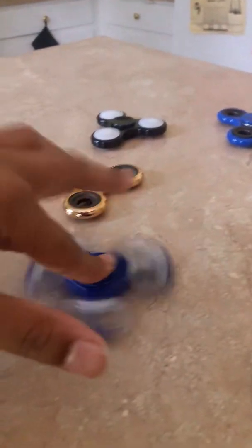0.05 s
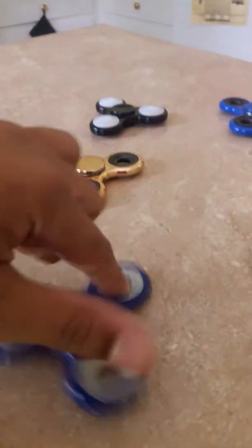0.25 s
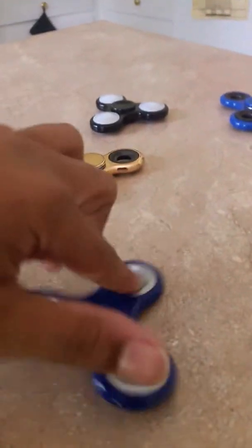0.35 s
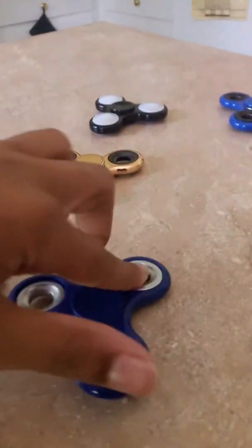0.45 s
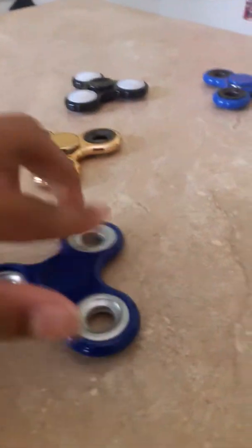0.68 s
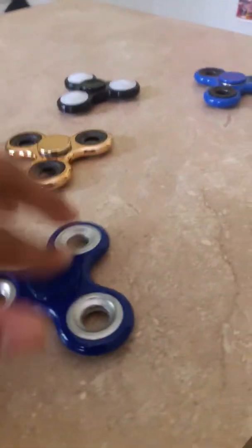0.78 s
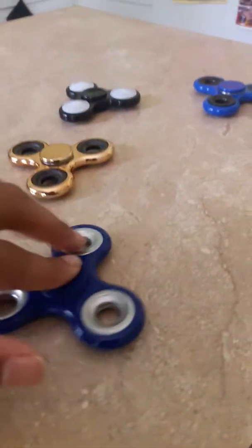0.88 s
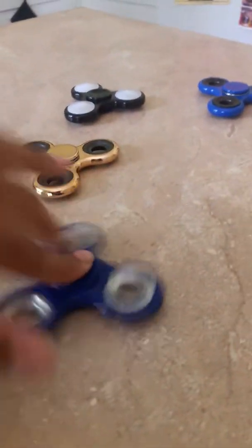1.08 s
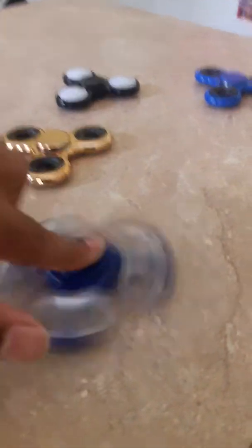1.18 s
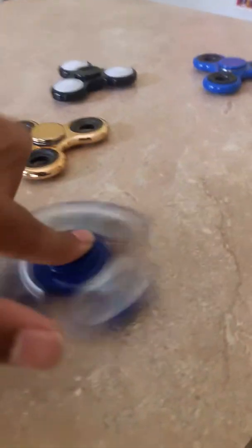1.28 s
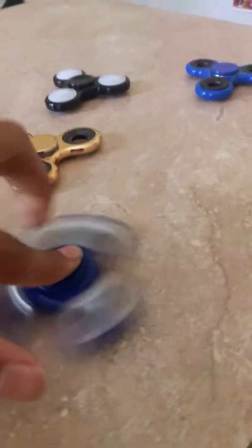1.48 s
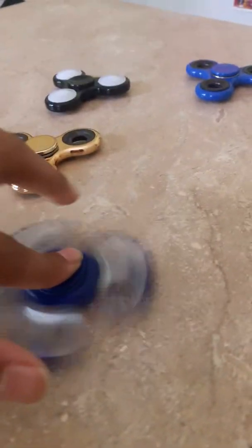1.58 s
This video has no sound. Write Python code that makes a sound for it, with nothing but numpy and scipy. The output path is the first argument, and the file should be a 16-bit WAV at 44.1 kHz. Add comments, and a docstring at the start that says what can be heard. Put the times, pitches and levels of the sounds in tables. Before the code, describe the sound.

A plastic fidget spinner whirs on a counter, is stopped with a clattering rattle, then flicked spinning again

```python
"""A plastic fidget spinner whirs on a kitchen counter: ball rumble, a low hum and grainy bearing hiss.
A finger stops it and it clacks and rattles on the top, as struck modes of counter, body and steel bearing.
Fingertips squeak (gliding tones) and rub in a new grip, among soft bumps, low thumps, bearing ticks and
rustles (noise bands). A finger flicks the spinner with hard clacks and the whir resumes.
The hard room rings after each clack."""
import sys
import numpy as np
from scipy import signal
from scipy.fft import rfft, irfft
from scipy.io import wavfile
from scipy.ndimage import uniform_filter1d

SR = 44100
rng = np.random.default_rng(int(sys.argv[2]) if len(sys.argv) > 2 else 0)


def bounce(signal):
    """Save signal as a 16-bit WAV file at the path given by the first command-line argument."""
    frames = np.transpose(np.atleast_2d(signal))
    limited = np.clip(frames, -1, 1)
    pcm = np.round(limited * 32767).astype(np.int16)
    wavfile.write(sys.argv[1], SR, pcm)


N = 72765

# Quiet kitchen spectrum. Each row: frequency in Hz, relative level in dB.
FLOOR_SPECTRUM = [(20, 0.5), (65, 0), (140, 2.5), (300, -3), (600, -8.5), (1100, -14.5), (2500, -27),
                  (4500, -39), (9000, -43), (16000, -38)]
FLOOR_DB = -58.5
# Left-right correlation of noises. Each row: frequency in Hz, likeness from 0 to 1.
STEREO_LIKENESS = [(50, 0.91), (300, 0.94), (700, 0.32), (1500, 0.21), (3000, 0.05), (16000, .1)]

# Decay of the room's tail. Each row: frequency in Hz, time to fall 60 dB in seconds.
ROOM_T60_S = [(100, 0.5), (350, 0.5), (1000, 0.46), (5000, 0.47), (8000, 0.39), (15000, 0.25)]
# Spectrum of the room's tail. Each row: frequency in Hz, relative level in dB.
ROOM_COLOUR = [(60, 6), (120, 8), (200, -2.5), (350, -3), (700, 0.5), (1400, -2.5), (2500, 3), (5000, 5),
               (8000, -2), (15000, 7)]
# Standing waves. Each row: frequency in Hz, relative level in dB, time to fall 60 dB in seconds.
ROOM_MODES = [(272, -36.5, 0.52), (410, -33.5, 0.2), (885, -49.5, .44)]
# Spectrum of the quick echoes. Each row: frequency in Hz, relative level in dB.
NEAR_COLOUR = [(100, 2.0), (1000, -1.5), (7000, -2.5), (15000, -6.5)]
ROOM_DB, ROOM_DELAY_S, BLOOM_S_AT_100_HZ = -3.5, 0.0063, 0.05
NEAR_DB, NEAR_DECAY_S, NEAR_RISE_S, NEAR_TAPS_PER_S = -6.5, 0.011, 0.00045, 1100
ROOM_MODES_DB, SPIN_ROOM_DB = -28.5, -4  # second: extra gain of the spin into the room

# Counter booming under the clacks. Each row: start in seconds, frequency in Hz, level in dB.
BOOMS = [(.207, 73.6, -41.5), (0.274, 124.8, -34.5), (1.25, 117.7, -40.5)]
BOOM_RISE_S = 0.02

# Fingertips slipping on plastic. Each row: start in seconds, length in seconds, start pitch in Hz,
# end pitch in Hz, level in dB.
SQUEAKS = [(.42, .035, 1080, 1120, -45), (.445, .045, 950, 915, -44), (.603, .016, 620, 520, -47),
           (.605, .02, 1080, 1120, -49)]
SQUEAK_JITTER, SQUEAK_OCTAVE_DB = 0.07, -13.5  # rms fraction of pitch; second harmonic
# Skin rubbing on the spinner (low rows); faint bearing rustles and a brief high tick (6-7 kHz rows).
# Each row: start in seconds, length in seconds, centre in Hz, level in dB.
RUBS_AND_RUSTLES = [(0.166, 0.014, 423, -41.5), (0.196, 0.01, 456, -34), (0.475, 0.0043, 6050, -52.5),
                    (0.913, 0.12, 6890, -80), (1.109, 0.055, 7190, -78), (1.146, 0.058, 295, -41)]
BAND_WIDTH_HZ_AT_1_KHZ = 281  # grows with the root of the centre

# Hard clacks: spinner on the counter, then a finger flicking the spinner. Each row: start in seconds,
# then relative levels of counter, body, clack and tick in dB, pitch factor of body and clack.
HARD_CLACKS = [(.2059, -17, -3, -9, -11, 1.034), (0.2076, -30.5, -12, -17, -16.5, 0.81),
               (0.2164, -28.5, -15.5, -24, -27.5, 1.14), (.2245, -33, -18.5, -20, -36.5, 1.14),
               (0.2295, -31, -16, -14, -34, 0.82), (.2470, -14, -10, -9.5, -29, .96),
               (0.2493, -34.5, -24.5, -34.5, -13.5, 0.75), (.2540, -20.5, -20, -8.5, -12, 1.05),
               (0.2624, -17.5, -11, -11.5, -10.5, .91), (.2685, -18.5, -8, -2.5, -25, 1.04),
               (0.2707, -17.5, -11.5, -7.5, -6.5, .95), (0.2757, -30.5, -16, -23, -23.5, 1.1),
               (.2870, -20.5, -13.5, -10, -25, 0.88), (.2925, -20.5, -16, -17.5, -22.5, 1.12),
               (0.332, -28, -27, -47, -47, 0.9), (0.35, -34.5, -27, -23.5, -41, 0.92),
               (1.1912, -43, -10.5, -10.5, -40, 0.916), (1.1925, -37.5, -15.5, -18, -18, 1.13),
               (1.2028, -38, -15, -21.5, -16.5, 0.88), (1.2482, -25, -20, -26, -37, 1.08),
               (1.2533, -20.5, -22, -27, -51, 0.86)]
# Modes of counter, body, clack and tick. Each row: frequency in Hz, relative level in dB,
# time to fall 60 dB in seconds.
COUNTER_MODES = [(293, -11, 0.2), (336, -5.5, 0.059), (420, 3, 0.055)]
BODY_MODES = [(553, -8.5, 0.023), (674, -4.5, 0.023), (890, -12.5, 0.014), (1006, -2, 0.022),
              (1499, -11, .028)]
CLACK_MODES = [(1937, -3.5, 0.014), (2282, -6.5, 0.022), (2730, -12, 0.029), (4696, -18.5, 0.0032)]
TICK_MODES = [(6427, -10, 0.0087), (7100, -9, 0.013), (7590, -8, 0.013), (9200, -14, 0.015),
              (13600, -18.5, .005), (15200, -13.5, .006)]
# Spectrum of chattering balls. Each row: frequency in Hz, relative level in dB.
CHATTER_SPECTRUM = [(100, -30.5), (1500, -5), (3000, -6.5), (5000, -6), (7300, 7), (10000, -3.5),
                    (12000, -3.5), (14500, -5.5)]
# Soft bumps and low thumps. Each row: start in seconds, relative thud level in dB, relative tick level in dB.
BUMPS_AND_THUMPS = [(0.661, -30, -25.5), (0.681, -32.5, -50), (1.181, -40.5, -38), (1.273, -27.5, -50)]
# Modes of a thud. Each row: frequency in Hz, relative level in dB, time to fall 60 dB in seconds.
THUD_MODES = [(175.7, -4.5, 0.35), (264, -3, 0.048), (336.5, 0, 0.031), (613, -13, 0.026),
              (1045, -3.5, 0.013), (1920, -8, 0.016)]
# Small bearing ticks. Each row: start in seconds, level in dB.
SMALL_TICKS = [(0.118, -42), (0.176, -40), (.448, -48), (0.635, -54.5), (0.646, -58), (0.682, -50),
               (.689, -55.5), (.902, -68), (1.25, -39.5), (1.297, -46), (1.311, -38), (1.324, -47),
               (1.368, -43.5), (1.554, -49), (1.565, -52), (1.585, -49), (1.639, -43.5)]
COUNTER_RISE_S, SMALL_TICK_DECAY_S = 0.002, 0.0024
SNAP_DB, SNAP_S = -23.5, 0.0001
CHATTER_DB, CHATTER_DECAY_S, TICK_RISE_S = -8, 0.0019, 0.00025
CLACK_LOW_HZ, BUMP_LOW_HZ = 247.2, 111  # high-pass corners
PHASE_SPREAD_RAD_PER_KHZ = 0.49

# Hum of the spinning body. Each row: time in seconds, pitch in Hz, level in dB under the rumble's envelope.
HUM = [(0, 179.8, -5.5), (.19, 181.8, -6.5), (1.32, 166.7, -19), (1.385, 161.5, -2), (1.49, 160, -7.5),
       (1.56, 159.5, -17.5)]
# The spin. Each row: time in seconds, rumble envelope in dB, bearing hiss envelope in dB.
SPIN = [(0, -43, -57.5), (.151, -44, -59), (.175, -44, -57), (.203, -41.5, -48.5), (.245, -44, -55.5),
        (.285, -37.5, -43), (.355, -43.5, -46), (.41, -62.5, -88), (.7, -95, -105), (1.112, -68, -88.5),
        (1.185, -50.5, -63), (1.213, -38.5, -43), (1.281, -39, -49), (1.349, -43.5, -57.5),
        (1.518, -44.5, -57.5), (1.65, -41, -52.5)]
# Spectra of rumble and hiss. Each row: frequency in Hz, relative level in dB.
RUMBLE_SPECTRUM = [(40, -25), (100, -17), (170, 2), (215, 5.5), (300, -5), (450, 1), (650, -8), (790, -18),
                   (915, 0.5), (1100, -10), (1400, -18.5), (2000, -19.5), (3000, -31), (16000, -66.5)]
HISS_SPECTRUM = [(100, -36), (3000, -27.5), (5800, -19), (6600, -0.5), (7350, 5.5), (8200, -2), (10000, -8),
                 (12300, -15), (13100, -6.5), (15500, -4.5)]
RUMBLE_NOISE_DB = -3
GRAINS_PER_S, GRAIN_SPREAD_DB = 5000, 2.5
FLUTTER_DB, FLUTTER_HZ = 1.3, 29.5  # rumble, hum and booms
FLURRY_DB, FLURRY_HZ = 2.2, 70  # hiss
RUMBLE_PAN_DB, BODY_PAN_DB, HISS_PAN_DB = 2.5, 3.5, 3.5  # left over right

RECORD_LOW_HZ, RECORD_EDGE_HZ = 70, 15900


def amp(db):
    """Decibels to gain."""
    return 10 ** (np.asarray(db) / 20)


def unit(x):
    """Scales to rms 1."""
    return x / np.sqrt(np.mean(x ** 2) + 1e-20)


def read(points, hz):
    """Reads a table on a log-frequency axis."""
    f, value = np.transpose(points)
    return np.interp(np.log(hz + 1), np.log(f), value)


def pan(db):
    """Left and right gains, db apart."""
    return amp(np.array([[db], [-db]]) / 2)


def add(mix, start_s, sound):
    """Adds a sound to the mix at start_s."""
    part = mix[:, round(start_s * SR):][:, :sound.shape[-1]]
    part += sound[..., :part.shape[1]]


def colour(x, points):
    """Shapes two unrelated channels by a spectrum and makes their bass alike; rms 1."""
    hz = np.fft.rfftfreq(x.shape[1], 1 / SR)
    z = rfft(x)
    angle = np.arcsin(np.clip(read(STEREO_LIKENESS, hz), -1, 1)) / 2
    mixed = np.cos(angle) * z + np.sin(angle) * z[::-1]
    return unit(irfft(mixed * amp(read(points, hz)), x.shape[1]))


def noise(points, size):
    """Stereo noise with the given spectrum."""
    return colour(rng.standard_normal((2, size)), points)


def ring(modes, t, pitch=1):
    """Struck modes dying away; the higher ones reach the two microphones further out of step."""
    out = np.zeros((2, len(t)))
    sides = np.array([[1], [-1]])
    for hz, db, t60_s in modes:
        spread = PHASE_SPREAD_RAD_PER_KHZ * min(hz / 1000, 2) * rng.choice([-1, 1])
        skew = spread * sides * np.minimum(t * hz, 1)  # grows over the first cycle
        out -= amp(db - 60 * t / t60_s) * np.sin(2 * np.pi * hz * pitch * t + skew)
    return out


def flutter(depth_db, rate_hz):
    """Uneven swelling of the running bearing, as a gain from slow random noise of rms depth_db."""
    hz = np.fft.rfftfreq(N, 1 / SR)
    slow = irfft(rfft(rng.standard_normal(N)) * hz * np.exp(-(hz / rate_hz) ** 2), N)
    return amp(depth_db * unit(slow))


def quiet_kitchen():
    """Steady background noise, strongest in the bass."""
    return amp(FLOOR_DB) * noise(FLOOR_SPECTRUM, N)


def room(x):
    """Separate quick echoes from hand and cupboards, then the kitchen's tail and its standing waves."""
    t = np.arange(SR) / SR
    hz, age_s, z = signal.stft(noise(ROOM_COLOUR, SR), SR, nperseg=256)
    bloom = 1 - np.exp(-age_s * (hz[:, None] + 1) / 100 / BLOOM_S_AT_100_HZ)  # bass builds up slowest
    decay = amp(-60 * age_s / read(ROOM_T60_S, hz)[:, None])
    tail = signal.istft(z * bloom * decay, SR, nperseg=256)[1][:, :SR]
    tail = unit(tail * np.clip(t / ROOM_DELAY_S - 1, 0, 1))

    taps = rng.choice([-1, 1], (2, SR)) * (rng.random((2, SR)) < NEAR_TAPS_PER_S / SR)
    near = colour(taps, NEAR_COLOUR) * np.exp(-t / NEAR_DECAY_S)
    near = unit(near * np.minimum(t / NEAR_RISE_S, 1))

    response = (amp(ROOM_DB) * tail + amp(NEAR_DB) * near) / np.sqrt(SR)
    response = response + amp(ROOM_MODES_DB) * ring(ROOM_MODES, t)
    return signal.fftconvolve(x, response, axes=1)[:, :N]


def booms():
    """The slab swells and sinks unevenly at a low pitch under the heavier clacks."""
    out, t = np.zeros((2, N)), np.arange(SR // 2) / SR
    swell = t / BOOM_RISE_S * np.exp(1 - t / BOOM_RISE_S)
    for start_s, hz, db in BOOMS:
        add(out, start_s, amp(db) * swell * np.sin(2 * np.pi * hz * t))
    return pan(RUMBLE_PAN_DB) * out * flutter(FLUTTER_DB, FLUTTER_HZ)


def squeaks():
    """Skin sticks and slips: short gliding tones of unsteady pitch."""
    out = np.zeros((2, N))
    for start_s, length_s, start_hz, end_hz, db in SQUEAKS:
        u = np.linspace(0, 1, round(length_s * SR))
        jitter = unit(uniform_filter1d(rng.standard_normal(N), size=60))[:len(u)]
        hz = (start_hz + (end_hz - start_hz) * u) * (1 + SQUEAK_JITTER * jitter)
        phase = 2 * np.pi * np.cumsum(hz) / SR
        tone = np.sin(phase) + amp(SQUEAK_OCTAVE_DB) * np.sin(2 * phase)
        add(out, start_s, amp(db) * np.sqrt(abs(np.sin(np.pi * u))) * tone)
    return out


def rubs_and_rustles():
    """Low skin rubs, faint bearing rustles and a brief high tick: swelling bands of noise."""
    out, f = np.zeros((2, N)), np.fft.rfftfreq(N, 1 / SR) + 1
    for start_s, length_s, hz, db in RUBS_AND_RUSTLES:
        swell = np.hanning(round(length_s * SR))
        width_squared = BAND_WIDTH_HZ_AT_1_KHZ ** 2 * hz / 1000
        band_gain = 1 / (1 + (f - hz) ** 2 / width_squared) ** 1.5
        band = irfft(rfft(rng.standard_normal(N)) * band_gain, N)
        add(out, start_s, amp(db) * swell * unit(band[:len(swell)]))
    return out


def tick(t):
    """The steel bearing rings while its balls chatter for a few milliseconds."""
    chatter = amp(CHATTER_DB) * noise(CHATTER_SPECTRUM, len(t)) * np.exp(-t / CHATTER_DECAY_S)
    steel = ring(TICK_MODES, t, rng.uniform(0.97, 1.02))
    return (steel + chatter) * (1 - np.exp(-t / TICK_RISE_S))


def bumps_and_thumps():
    """Soft bumps and low thumps: thud modes and a bearing tick, thinned in the bass."""
    out, t = np.zeros((2, N)), np.arange(SR // 4) / SR
    soft_touch = signal.butter(2, BUMP_LOW_HZ, "high", fs=SR, output="sos")
    for start_s, thud_db, tick_db in BUMPS_AND_THUMPS:
        bump = amp(thud_db) * ring(THUD_MODES, t) + amp(tick_db) * tick(t)
        add(out, start_s, signal.sosfilt(soft_touch, bump) / 2)
    return out


def small_ticks():
    """Bearing ticks: bursts of hiss-coloured noise dying within milliseconds."""
    out, t = np.zeros((2, N)), np.arange(SR // 4) / SR
    for start_s, db in SMALL_TICKS:
        burst = noise(HISS_SPECTRUM, len(t)) * np.exp(-t / SMALL_TICK_DECAY_S)
        add(out, start_s, pan(HISS_PAN_DB) * amp(db) * burst)
    return out


def hard_clacks():
    """Hard contacts ring counter, plastic body and bearing in varying shares; a sharp snap starts each."""
    out, t = np.zeros((2, N)), np.arange(SR // 4) / SR
    snap = amp(SNAP_DB) * t / SNAP_S * (t / SNAP_S - 2) * np.exp(-t / SNAP_S)
    small_body = signal.butter(2, CLACK_LOW_HZ, "high", fs=SR, output="sos")
    for start_s, counter_db, body_db, clack_db, tick_db, pitch in HARD_CLACKS:
        counter = amp(counter_db) * ring(COUNTER_MODES, t) * (1 - np.exp(-t / COUNTER_RISE_S))
        body = pan(BODY_PAN_DB) * amp(body_db) * ring(BODY_MODES, t, pitch)
        clack = amp(clack_db) * (ring(CLACK_MODES, t, pitch) + snap)
        bearing = pan(HISS_PAN_DB) * amp(tick_db) * tick(t)
        add(out, start_s, signal.sosfilt(small_body, counter + body + clack + bearing) / 2)
    return out


def hum():
    """The spinning body hums on one low, drifting note of uneven level."""
    t = np.arange(N) / SR
    time_s, hz, db = np.transpose(HUM)
    phase = 2 * np.pi * np.cumsum(np.interp(t, time_s, hz)) / SR
    return amp(np.interp(t, time_s, db)) * np.sin(phase) * flutter(FLUTTER_DB, FLUTTER_HZ)


def spin():
    """Rolling balls rumble through the counter and hiss in fine grains that come in flurries."""
    t = np.arange(N) / SR
    time_s, rumble_db, hiss_db = np.transpose(SPIN)
    grain_gain = amp(GRAIN_SPREAD_DB * np.minimum(rng.exponential(1, N), 4))
    strikes = (rng.random(N) < GRAINS_PER_S / SR) * grain_gain
    hiss = colour(strikes * rng.standard_normal((2, N)), HISS_SPECTRUM)
    hiss = hiss * amp(np.interp(t, time_s, hiss_db)) * flutter(FLURRY_DB, FLURRY_HZ)
    rumble = amp(RUMBLE_NOISE_DB) * noise(RUMBLE_SPECTRUM, N) + hum()
    rumble = rumble * amp(np.interp(t, time_s, rumble_db)) * flutter(FLUTTER_DB, FLUTTER_HZ)
    return pan(RUMBLE_PAN_DB) * rumble + pan(HISS_PAN_DB) * hiss


def scene():
    """Spinner and fingers in the quiet kitchen; booms and background bypass the room."""
    handling = hard_clacks() + bumps_and_thumps() + small_ticks() + squeaks() + rubs_and_rustles()
    whir = spin()
    echoes = room(handling + amp(SPIN_ROOM_DB) * whir)
    return quiet_kitchen() + echoes + booms() + handling + whir


def record(dry):
    """The microphone's bass roll-off and the band limit."""
    thin = signal.sosfilt(signal.butter(2, RECORD_LOW_HZ, "high", fs=SR, output="sos"), dry)
    band_limit = signal.firwin(255, RECORD_EDGE_HZ, window=("kaiser", 8), fs=SR)
    return signal.oaconvolve(thin, band_limit[None], "same")


dry = scene()
out = record(dry)
bounce(out)
```